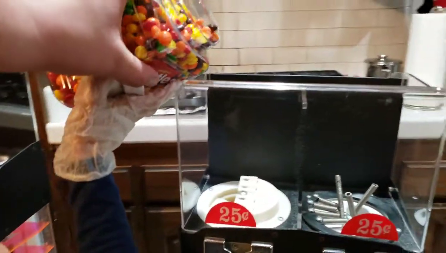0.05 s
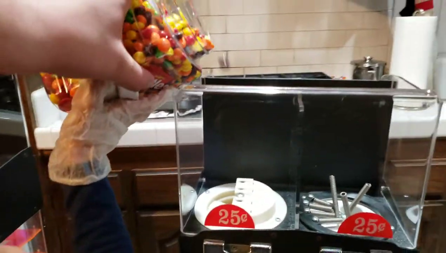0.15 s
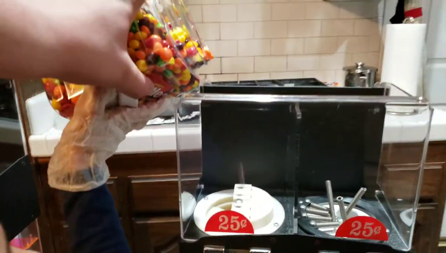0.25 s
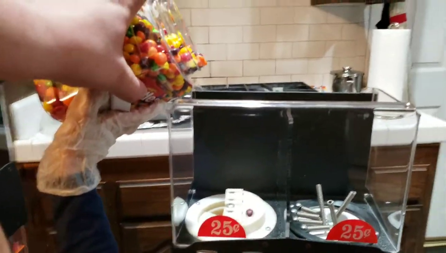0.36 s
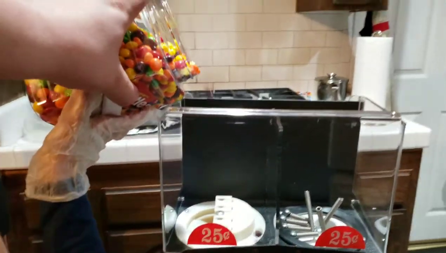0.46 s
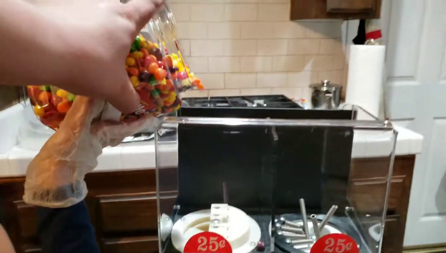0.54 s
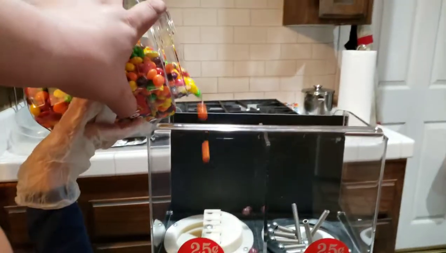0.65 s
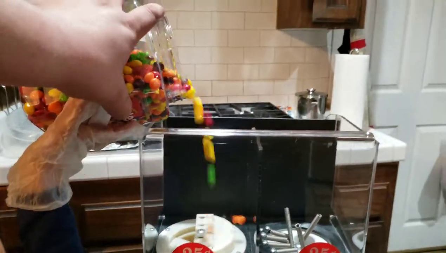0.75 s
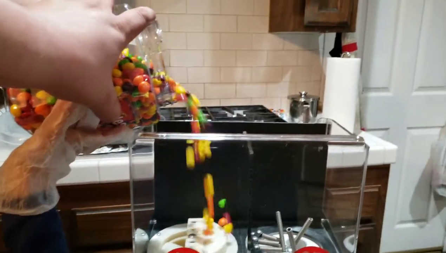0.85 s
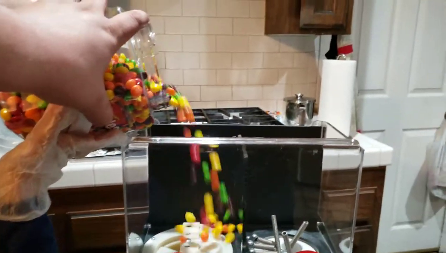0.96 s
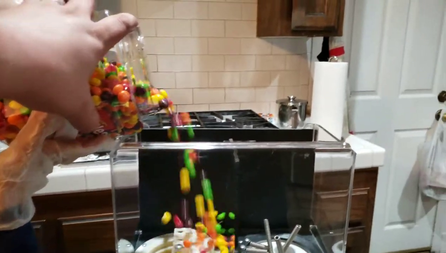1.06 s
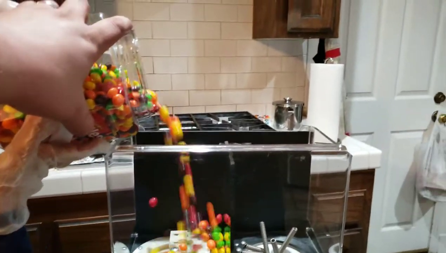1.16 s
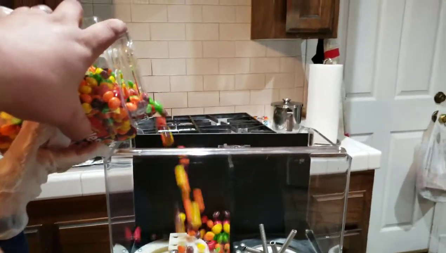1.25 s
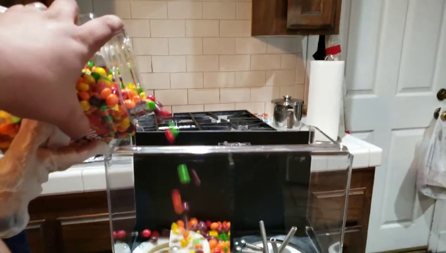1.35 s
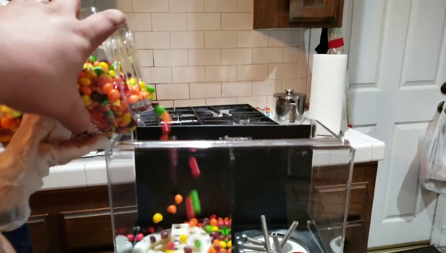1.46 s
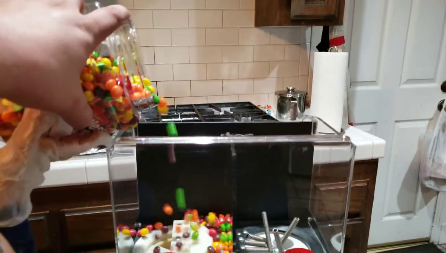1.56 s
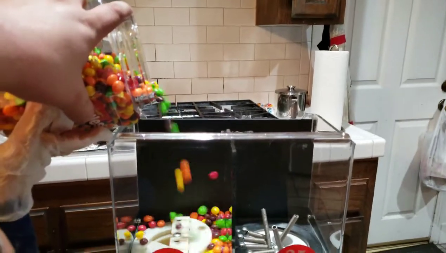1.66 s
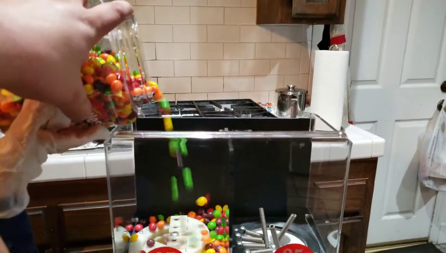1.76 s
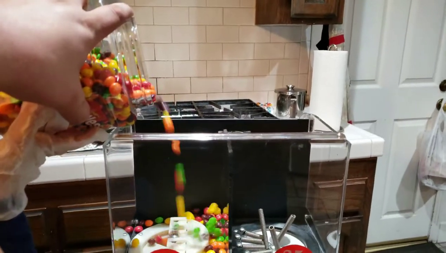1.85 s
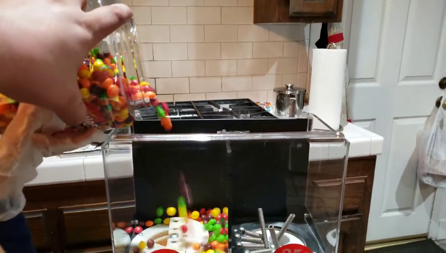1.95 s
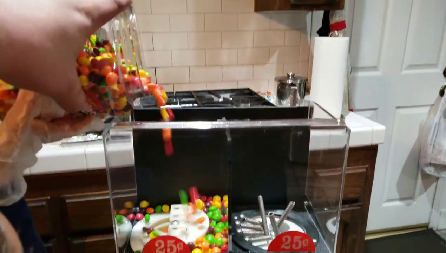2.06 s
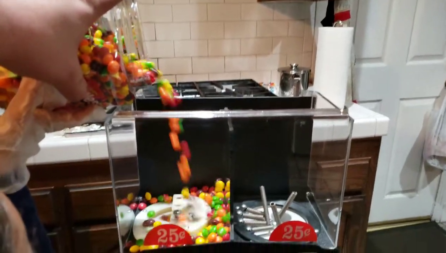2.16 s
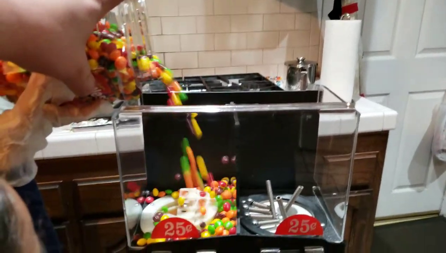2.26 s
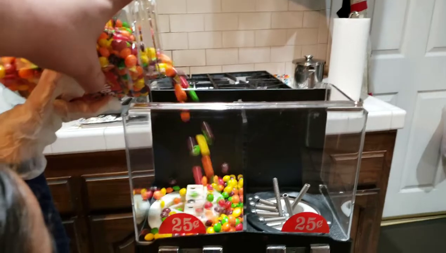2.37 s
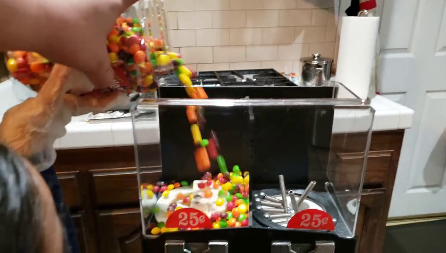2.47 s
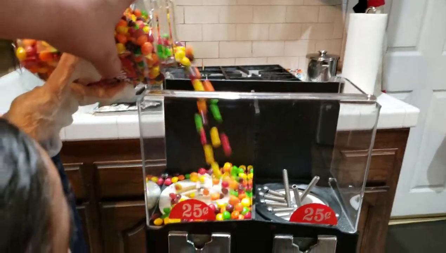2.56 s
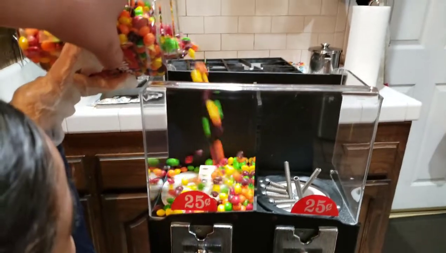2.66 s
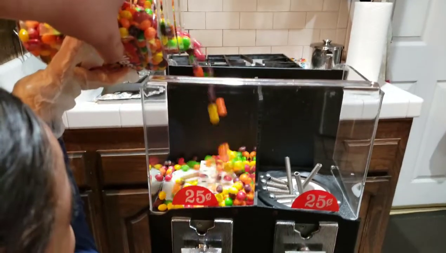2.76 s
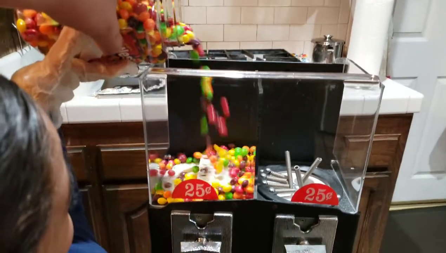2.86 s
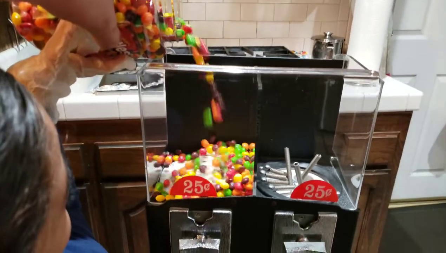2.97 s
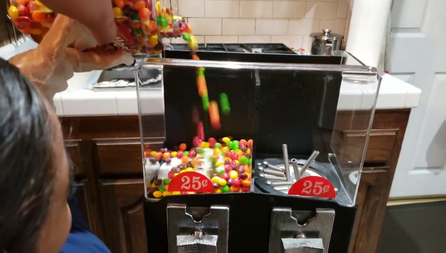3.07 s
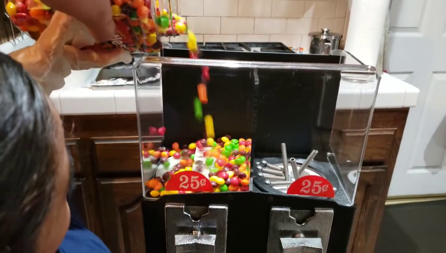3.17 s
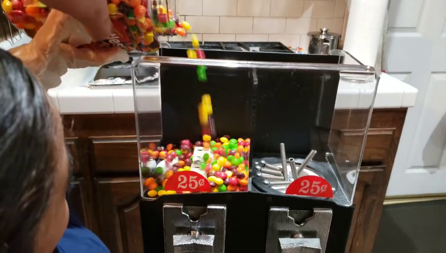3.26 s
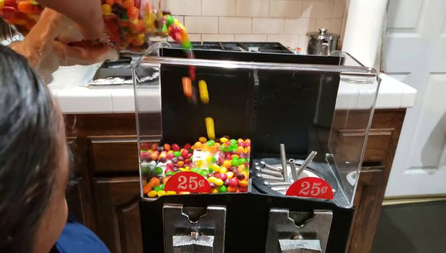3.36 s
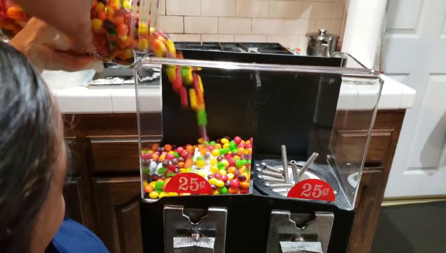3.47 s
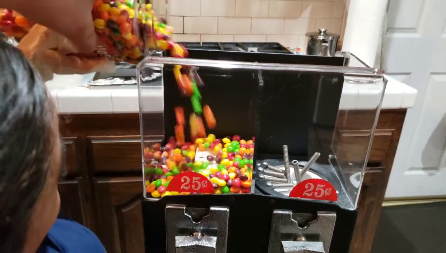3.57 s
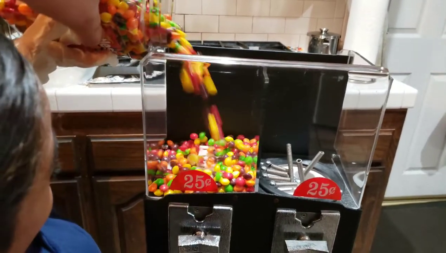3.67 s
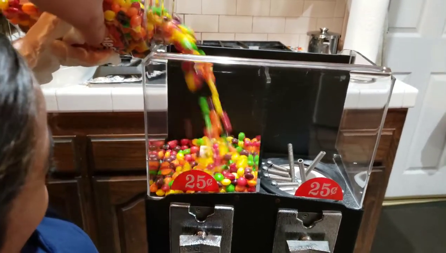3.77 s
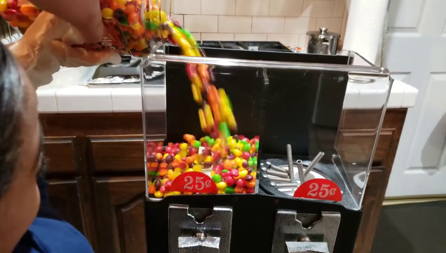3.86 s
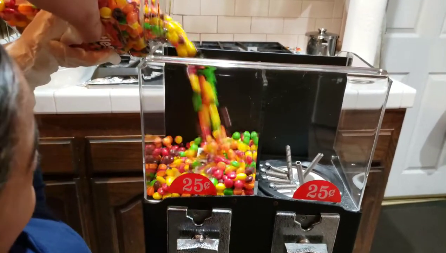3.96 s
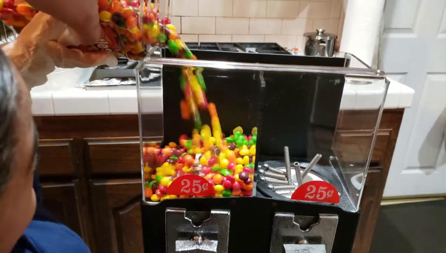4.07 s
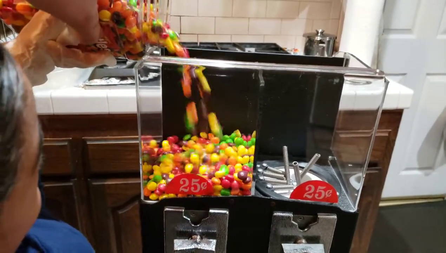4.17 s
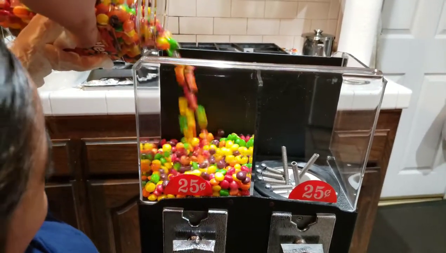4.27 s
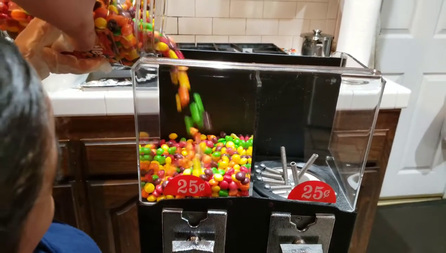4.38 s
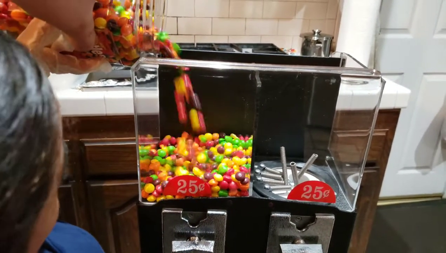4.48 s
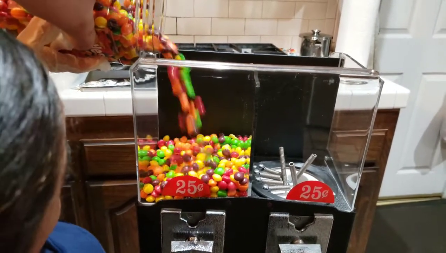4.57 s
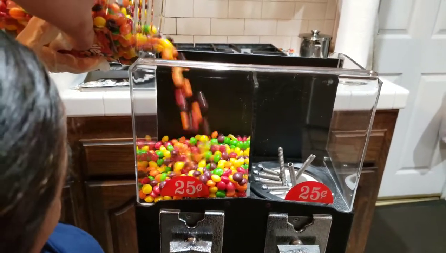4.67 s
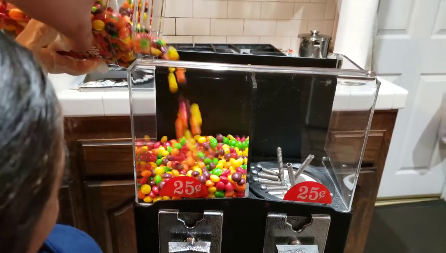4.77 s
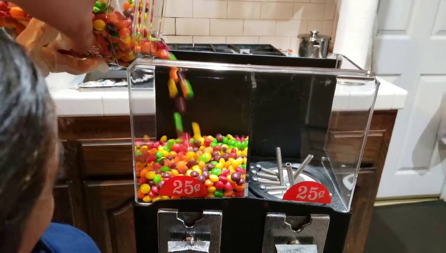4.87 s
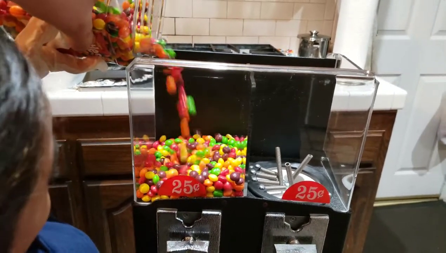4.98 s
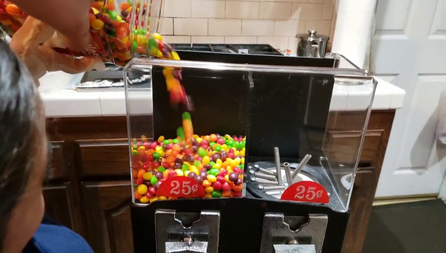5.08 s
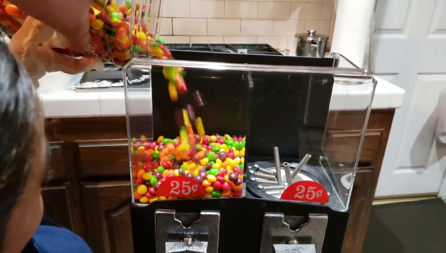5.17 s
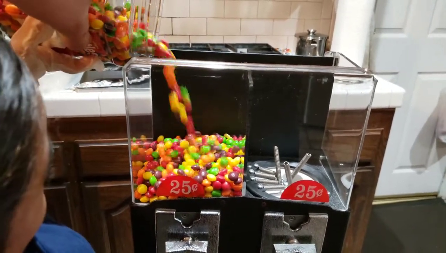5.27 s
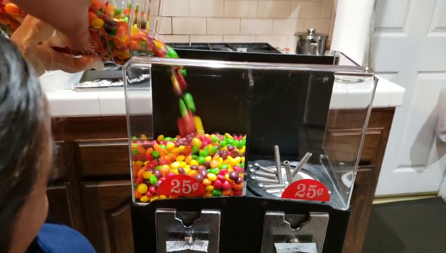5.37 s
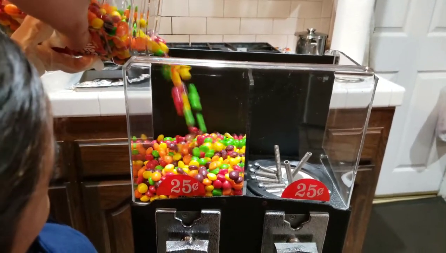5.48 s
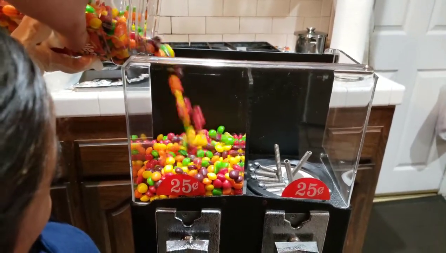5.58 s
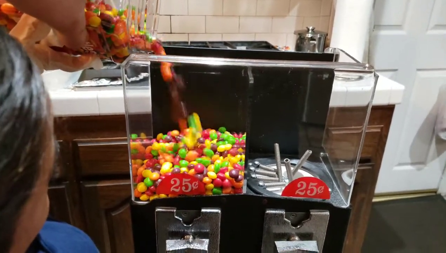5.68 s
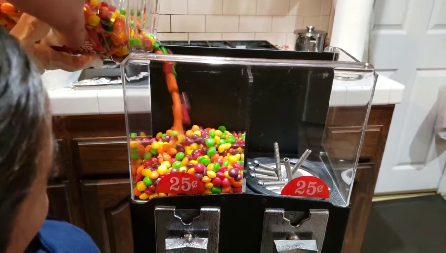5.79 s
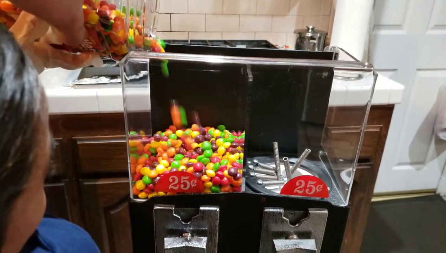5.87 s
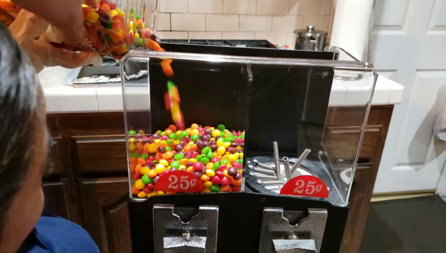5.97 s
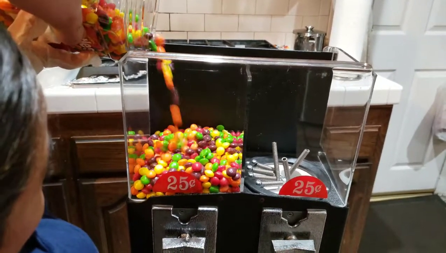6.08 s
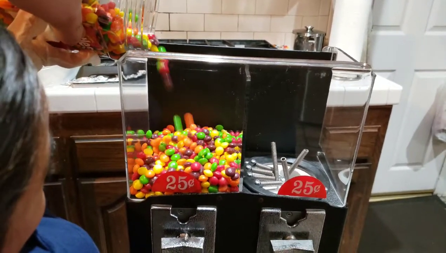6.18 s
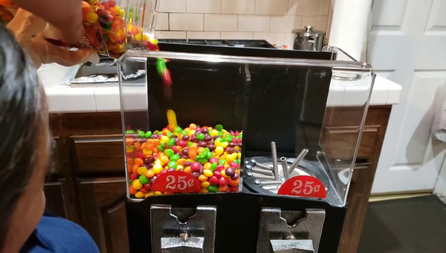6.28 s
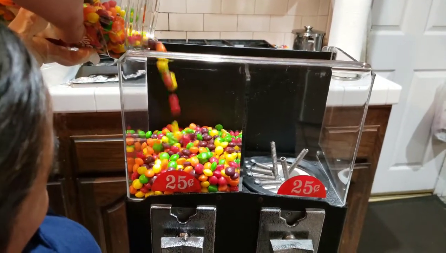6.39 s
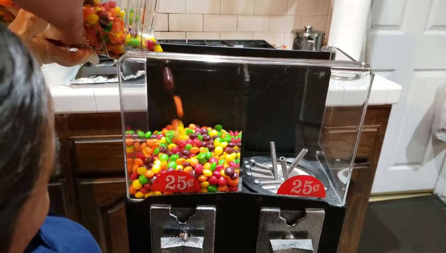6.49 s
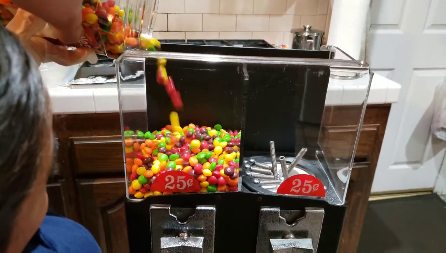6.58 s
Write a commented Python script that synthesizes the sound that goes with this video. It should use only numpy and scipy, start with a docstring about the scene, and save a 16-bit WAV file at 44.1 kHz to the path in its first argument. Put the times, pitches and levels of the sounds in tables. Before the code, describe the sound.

Hard-shelled candies pour from a crinkly bag into a plastic canister in a kitchen, ringing hollow at first, then clattering candy on candy.

```python
"""A bag crinkles in a kitchen as hard-shelled candies slide to its lip: bright noise ticks over low noise.
The first few knock on a clear plastic canister and its dispensing wheel: cracks of noise and decaying modes.
Then a stream follows: showers of random impacts of shell on shell, on the heap and on the plastic.
As the heap grows, the walls ring less, candy lands on candy and small clinks multiply.
Towards the end the pour thins, and clear clinks stand out on top of the heap."""
import sys
import numpy as np
from scipy import signal
from scipy.io import wavfile
from scipy.ndimage import uniform_filter1d

SR = 44100
rng = np.random.default_rng(int(sys.argv[2]) if len(sys.argv) > 2 else 0)


def dump_mix(stems):
    """Bounce the given channels to the path in sys.argv[1] as a 16-bit WAV at rate SR."""
    frames = np.atleast_2d(stems).T  # one column per channel
    limited = np.clip(frames, -1, 1)  # hard clip at full scale
    pcm = np.round(limited * 32767).astype(np.int16)
    wavfile.write(sys.argv[1], SR, pcm)


N = 292471
TIME = np.arange(N) / SR  # s, the whole scene
RING = np.arange(12288) / SR  # s, the length of one strike

# dull bumps of handling: start_s (of the middle), level_db (rms at the middle), length_s
BUMPS = [(.175, -48, 0.041), (.25, -47, 0.12), (0.362, -44.5, .06), (3.504, -57, 0.068)]
# snaps of the plastic bag as it tips: start_s, peak_db (before the echo)
CRINKLES = [(0.0336, -22), (0.0862, -31), (0.1024, -36), (0.1475, -30), (0.2012, -18), (0.221, -26),
            (0.2974, -26), (0.4323, -18)]
# candy sliding to the lip before the stream starts: start_s, length_s, level_db, fade_db_per_s
SLIDES = [(-.05, 0.31, -33, -38), (0.584, .2, -35, -3)]
# hollow knocks of a candy on the dispensing wheel at the bottom: start_s, peak_db (before the echo)
WHEEL_HITS = [(0.45, -19), (0.5474, -26.5), (0.7069, -27), (1.859, -32), (1.952, -33), (2.3692, -26),
              (2.528, -23.5), (2.7494, -28), (3.027, -26), (3.1, -28.5)]
# single candies hitting the plastic: start_s, level_db, brightness_db_per_octave, canister_ringing_db
KNOCKS = [(0.3058, -15.5, -0.5, 1.5), (0.3272, -16.5, -0.5, -16), (0.448, -16.5, 1.5, 0),
          (0.5091, -17.5, 3.5, -14), (0.5476, -19, 1, -1), (.583, -14, 1.5, -7), (0.587, -18.5, 3, 6),
          (.635, -11, 5, -14), (0.708, -19, 3, 6), (0.733, -18.5, 1.5, 0), (0.7897, -17.5, -0.5, -4),
          (0.8016, -5, 11, -19), (0.9033, -12, 6, -3), (0.971, -11, 4, 0), (1.023, -19.5, 1, -10),
          (1.279, -14.5, 8, 0.5), (3.58, -18, 4, -6), (3.786, -14.5, 4.5, -5), (3.9146, -15, 1.5, -5),
          (4.4154, -16, 3.5, 2.5)]
# sharp clacks of shell on shell: start_s, level_db, brightness_db_per_octave
CLACKS = [(1.734, -21, -4), (1.7891, -19.5, 0), (1.824, -21, 0.5), (1.865, -18, 4), (1.9218, -16.5, 2),
          (1.982, -18, 2), (2.0136, -20, 4), (2.1068, -19, -1.5), (2.2313, -15.5, 1.5), (2.3057, -12, 3),
          (2.384, -13, 6), (2.524, -17, 6), (2.553, -15, 2), (2.843, -27, 7), (2.9727, -15.5, 5),
          (3.022, -13.5, 1), (3.1888, -14.5, 6), (3.32, -15.5, -1), (3.46, -20.5, -4), (3.772, -16.5, -2),
          (4.9128, -18, -2), (5.256, -15, -1), (5.692, -17, 2), (5.7729, -15, 7), (5.8458, -19.5, 0),
          (6.1363, -17, -1.5), (6.2915, -14.5, 1.5)]
# clean clinks of one candy striking another on top of the heap: start_s, peak_db (dry), pitch_hz
CLINKS = [(3.315, -31, 3960), (6.0566, -30.5, 4170), (6.0931, -32, 4440), (6.2467, -31, 4230),
          (6.334, -31, 4440), (6.345, -26.5, 4200), (6.4268, -29.5, 4300), (6.4918, -20.5, 4170),
          (6.535, -24, 4280), (6.6149, -28, 4230)]
# fainter clinks inside the stream: pitch_hz (centre), peak_db (typical, re the flow), rate_per_s (full heap)
SMALL_CLINKS = [(2306, -13.5, 25), (4340, -11, 45), (11830, -7, 51)]
# how hard the candy pours from the bag: start_s, flow_db
FLOW = [(0.77, -32.5), (0.83, -22), (0.99, -20.5), (1.2, -23), (1.5, -28.0), (1.66, -29.5), (1.9, -27.5),
        (2.15, -29.5), (2.24, -26), (2.7, -24), (3.1, -27), (3.46, -27.5), (3.58, -23), (3.68, -26),
        (3.96, -23.4), (4.42, -25.5), (4.95, -27.5), (5.26, -27), (5.72, -26.5), (5.98, -31.5), (6.14, -30),
        (6.63, -29.5)]
# candies jam at the lip (a dip) or tumble over it in a clump (a surge): start_s (of the middle), change_db
STUTTERS = [(1.705, -5.5), (1.772, -10.5), (2.059, -7.5), (2.16, -4.5), (3.58, 2), (3.781, 2.5), (3.86, -1),
            (4.28, 2.5), (4.7, 2), (4.89, -3), (5.97, -4), (6.27, -4.5)]

# ringing modes of the canister: pitch_hz, energy_db (relative), t60_s
CANISTER = [(129, -41, 1), (180.5, -31, 0.54), (323, -23, 0.17), (355.4, -23.5, 0.18), (401, -19.5, 0.24),
            (566.7, -22.5, 0.27), (655.6, -25.5, 0.32), (908, -23, 0.39), (1347, -14, 0.068),
            (1515, -12.5, 0.062), (1685, -16.5, 0.043), (1758, -39, 0.39), (1960, -25, 0.058),
            (2306, -16, 0.21), (2470, -20, 0.032), (2510, -19.5, 0.26), (3107, -15, 0.084),
            (4195, -15.5, 0.17)]
# ringing modes of the hollow above the heap: pitch_hz, energy_db (relative), t60_s
HOLLOW = [(177, -43, 0.32), (317.5, -26.5, 0.17), (402.7, -25.5, 0.21), (485, -21.5, 0.1),
          (2050, -57, 0.088), (2430, -31, 0.1), (3550, -6.5, 0.0052)]
# brief modes of candies jostling in the bag and the heap: pitch_hz, energy_db (relative), t60_s
JOSTLE = [(428, -28.5, 0.061), (1325, -25, 0.03), (2265, -35, 0.036), (4230, -15, 0.053),
          (7760, -13, 0.0065), (11500, -7, 0.01)]
# ringing modes of the dispensing wheel: pitch_hz, energy_db (relative), t60_s
WHEEL = [(1350, -0.5, 0.1), (1500, -1.5, 0.044), (1686, -10, 0.054), (1814, -4.5, 0.22)]
# colour of a candy on plastic: frequency_hz, density_db (per Hz)
PLASTIC = [(60, -76), (220, -14), (330, -5.5), (600, -1.5), (780, -4.5), (1150, -7), (1400, 0.5), (2600, 1),
           (4300, 0), (7500, -4), (9000, -6.5), (16000, -7.5)]
# colour of a candy on the heap: frequency_hz, density_db (per Hz)
HEAP = [(60, -28.5), (230, -17), (350, -11.5), (750, -12.5), (1100, -7.5), (1800, -8.5), (2400, -6),
        (4400, -2), (5600, -4.5), (6400, -3.5), (7700, -0.5), (8600, -7), (16000, -10.5)]
# colour of shell on shell: frequency_hz, density_db (per Hz)
SHELL = [(60, -45), (200, -24), (350, -9), (750, -18), (1100, -8.5), (1800, -7), (2250, -4.5),
         (2800, -10.5), (3500, 0.5), (4400, 2.5), (5600, -9), (7600, -3.5), (8700, -7.5), (11500, 6),
         (15500, 0.5)]
# resonances that swell and fade as the heap rises:
# pitch_hz, width_hz, strongest_fill (0-1), fill_range (0-1), boost_db (at the strongest)
FILL_MODES = [(2622, 29, 0.05, 0.11, 10), (2955, 52, 0.25, 0.17, 6.5), (1396, 85, 0.37, 0.45, 2.5),
              (4700, 790, 0.48, .15, 3), (2350, 110, 0.64, 0.18, 7), (427, 1170, 1, 0.14, 6),
              (2090, 150, 1, 0.25, 5)]

FLOOR_DB = -68  # rms of the room's low noise
EDGE_HZ = 15820  # upper band limit of the recorder
ROOM_T60_LOW, ROOM_T60_HIGH = 0.47, 0.3  # s, below and above about 2 kHz
ROOM_SPLIT = signal.butter(1, 2000, fs=SR)
STUTTER_S = 0.037
# share of the flow heard as shells chattering, landings on the heap, and blows on the plastic (canister empty)
CHATTER_DB, HEAP_DB, PLASTIC_DB = -5, -3, -8
COVERED_DB = -7.5  # blows on the plastic fade as the heap covers it
SHORT_DROP_DB, SHORT_DROP_POWER = -5.5, 5  # landings soften once the heap is high and the fall is short
LATE_CHATTER_DB = 4  # meanwhile the loose candy in the emptying bag chatters more
THINNING = 0.6  # a weaker flow has fewer impacts: their rate goes as its amplitude to this power
CLINK_SPREAD_DB, CLINK_DETUNE = 3.5, 0.046  # standard deviations of level and of relative pitch


def amp(db):
    """Decibels to gain."""
    return 10 ** (np.asarray(db) / 20)


def unit(x):
    """Scales to energy 1."""
    return x / np.linalg.norm(x)


def read(points, hz):
    """Reads a colour table on a log-frequency axis."""
    f, value = np.transpose(points)
    return np.interp(np.log(hz + 1), np.log(f), value)


def add(mix, s, sound):
    """Lays a sound into the mix at time s."""
    part = mix[max(round(s * SR), 0):][:len(sound)]
    part += sound[:len(part)]


def swell(s, length):
    """A smooth bump of height 1 around time s."""
    return np.exp(-(2 * (TIME - s) / length) ** 2)


def dying(t60):
    """An exponential decay over the length of one strike."""
    return np.exp(-np.log(1000) * RING / t60)


def low_noise(top_hz):
    """Dark noise of rms 1."""
    band = signal.butter(2, [35, top_hz], "bandpass", fs=SR, output="sos")
    return unit(signal.sosfilt(band, rng.standard_normal(N))) * np.sqrt(N)


def background():
    """Handling bumps, as swells of very low noise, over the steady low noise of the room."""
    bumps = sum(amp(db) * swell(s, length) for s, db, length in BUMPS)
    return bumps * low_noise(top_hz=118) + amp(FLOOR_DB) * low_noise(top_hz=500)


def room_tail():
    """Diffuse echo of the kitchen; the treble dies first."""
    noise = rng.standard_normal(len(RING))
    low = signal.lfilter(*ROOM_SPLIT, noise)
    tail = low * dying(ROOM_T60_LOW) + (noise - low) * dying(ROOM_T60_HIGH)
    build_up = 1 - np.exp(-RING / 0.0037)
    return unit(tail * build_up)


def in_room(x, room_db):
    """A sound with the kitchen's echo behind it."""
    return x + amp(room_db) * signal.fftconvolve(x, room_tail())[:N]


def crinkles(t60=0.006, low_hz=2500, room_db=-9):
    """The bag snaps: very short, bright ticks of high-passed noise."""
    out = np.zeros(N)
    high_pass = signal.butter(1, low_hz, "highpass", fs=SR)
    for s, db in CRINKLES:
        tick = signal.lfilter(*high_pass, rng.standard_normal(len(RING)) * dying(t60))
        add(out, s, amp(db) * tick / abs(tick).max())
    return in_room(out, room_db)


def ringing(modes, detune):
    """Decaying modes, each weighted and detuned by where the candy lands."""
    sound = np.zeros(len(RING))
    landing = rng.uniform(-1, 1, (len(modes), 2))
    for (hz, db, t60), (weight, shift) in zip(modes, landing):
        t = RING[RING < max(t60, 0.002)]
        decay = np.exp(-np.log(1000) * t / t60)
        ring = np.sin(2 * np.pi * hz * (1 + detune * shift) * t) * decay
        gain = amp(db) * np.sign(weight) * (0.5 + abs(weight))
        add(sound, 0, gain * unit(ring))
    return sound


def wheel(room_db=-8):
    """The wheel answers each candy with a low, pitched knock made of its modes."""
    out = np.zeros(N)
    for s, db in WHEEL_HITS:
        ring = ringing(WHEEL, detune=0.0081)
        add(out, s, amp(db) * ring / abs(ring).max())
    return in_room(out, room_db)


def causal(db):
    """The most compact causal pulse with this spectrum (minimum phase)."""
    log_gain = np.log(amp(np.r_[db, db[-2:0:-1]]))
    return np.fft.ifft(np.exp(np.conj(signal.hilbert(log_gain)))).real


def shell_pings(ping_db, ping_t60=0.051, count=5):
    """Every contact also has a few short pitches of its own."""
    pitches = np.exp(rng.uniform(np.log(2000), np.log(15000), count))
    return ringing([(hz, ping_db, ping_t60) for hz in pitches], 0)


def strike(colour, modes, crack_t60, box_db, room_db, patchy_db, detune, tilt_db=0, ring_db=0,
           ping_db=-12, box_t60=0.17, rise_s=0.001):
    """One impact of energy 1: a crack, quick echoes between the walls, the room, and ringing modes."""
    crack, box = rng.standard_normal((2, len(RING)))
    burst = unit(crack * dying(crack_t60))
    burst = burst + amp(box_db) * unit(box * dying(box_t60))
    burst = burst + amp(room_db) * room_tail()
    # each point of contact favours its own bands
    hz = np.fft.rfftfreq(2048, 1 / SR)
    patches = uniform_filter1d(rng.standard_normal(len(hz)), size=44)
    # a harder, shorter contact is brighter: tilt in dB per octave above 1200 Hz
    hardness_db = tilt_db * np.log2(np.maximum(hz, 1200) / 1200)
    pulse = causal(read(colour, hz) + patchy_db * patches / patches.std() + hardness_db)
    clack = unit(signal.fftconvolve(burst, pulse)[:len(RING)])
    # a brighter contact rings the modes less
    sound = clack + amp(ring_db - tilt_db) * ringing(modes, detune) + shell_pings(ping_db)
    # the sound builds up over about a millisecond, a softened attack
    return unit(sound * (1 - np.exp(-RING / rise_s)))


def shower(level_db, per_s, spread_db, make_strike, count=70):
    """Many impacts at random moments and of random size, sharing the energy that the flow delivers."""
    busy = amp(THINNING * (level_db - level_db.max()))  # 1 at the strongest flow, where the rate is per_s
    sizes = amp(spread_db * np.minimum(rng.standard_normal(N), 2))
    sizes = sizes * (rng.random(N) < busy * per_s / SR) / np.sqrt(busy)
    # part of the chance clustering is evened out, then the flow sets the level
    power = uniform_filter1d(uniform_filter1d(sizes ** 2, size=1700), size=1700)
    sizes = sizes / np.sqrt(abs(power) + 0.66 * power.mean()) * amp(level_db)
    # the stream wanders: about ten spots are being hit at a time, and new ones replace the old
    spot = (TIME / TIME[-1] * count + 10 * rng.random(N)).astype(int)
    hits = np.flatnonzero(sizes)
    out = np.zeros(N)
    for k in range(count + 10):
        sound = make_strike()
        for at in hits[spot[hits] == k]:
            add(out, at / SR, sizes[at] * sound)
    return out


def nudge():
    """A soft, dull and short contact of shell on shell in the bag."""
    return strike(SHELL, JOSTLE, crack_t60=0.0017, box_db=-19, room_db=-7, patchy_db=4.5, detune=0.073,
                  tilt_db=-3.5, ring_db=-18, ping_db=-20, box_t60=0.023, rise_s=0.00028)


def sliding():
    """Candies nudge each other as the bag tips: dense showers of small contacts."""
    level_db = np.full(N, -200.0)
    for start, length, db, fade in SLIDES:
        on = (TIME >= start) & (TIME < start + length)
        level_db[on] = db + fade * (TIME[on] - start)
    return shower(level_db, per_s=700, spread_db=0.5, make_strike=nudge, count=20)


def knocks(span_s=0.0022):
    """Loud blows on the plastic; a level is the blow's energy spread over span_s."""
    out = np.zeros(N)
    for s, db, bright, ring in KNOCKS:
        knock = strike(PLASTIC, CANISTER, crack_t60=0.024, box_db=-3, room_db=-2, patchy_db=1.5,
                       detune=0.002, tilt_db=bright, ring_db=ring, ping_db=-23, rise_s=0.0007)
        add(out, s, amp(db) * knock)
    return out * np.sqrt(span_s * SR)


def clacks(span_s=0.0012):
    """Loud clacks of shell on shell; a level is the clack's energy spread over span_s."""
    out = np.zeros(N)
    for s, db, bright in CLACKS:
        # a duller, heavier contact sets the bag and the heap ringing
        ring_db = -6.5 - 1.6 * bright
        clack = strike(SHELL, JOSTLE, crack_t60=0.0067, box_db=-1, room_db=-11, patchy_db=4.5,
                       detune=0.015, tilt_db=bright, ring_db=ring_db, ping_db=-21.5, rise_s=0.00048)
        add(out, s, amp(db) * clack)
    return out * np.sqrt(span_s * SR)


def clink(hz, rise_s=0.00086, t60=0.011):
    """One short pitch of peak 1."""
    ring = np.sin(2 * np.pi * hz * RING) * (1 - np.exp(-RING / rise_s)) ** 2 * dying(t60)
    return ring / abs(ring).max()


def clinks(flow_db, fill, room_db=-8):
    """Candy meets candy cleanly: a few loud clinks, and many faint ones inside the stream."""
    out = np.zeros(N)
    for s, db, hz in CLINKS:
        add(out, s, amp(db) * clink(hz))
    for hz, db, per_s in SMALL_CLINKS:
        # more frequent as the heap grows
        hits = np.flatnonzero(rng.random(N) < np.sqrt(fill) * per_s / SR)
        size, shift = np.clip(rng.standard_normal((2, N)), -2, 2)
        for at in hits:
            level_db = flow_db[at] + db + CLINK_SPREAD_DB * size[at]
            pitch_hz = hz * (1 + CLINK_DETUNE * shift[at])
            add(out, at / SR, amp(level_db) * clink(pitch_hz))
    return in_room(out, room_db)


def pour():
    """The flow in dB with its stutters, and the height of the heap (0-1) that it builds."""
    flow_db = np.interp(TIME, *np.transpose(FLOW), left=-200)
    flow_db = flow_db + sum(db * swell(s, STUTTER_S) for s, db in STUTTERS)
    poured = np.cumsum(amp(flow_db))
    return flow_db, poured / poured[-1]


def shell_contact():
    """Shell on shell in the stream: a short crack with brief rings."""
    return strike(SHELL, JOSTLE, crack_t60=0.0036, box_db=-5, room_db=-11.5, patchy_db=3.5, detune=0.026,
                  ring_db=-6, ping_db=-19, rise_s=0.00075)


def heap_landing():
    """A candy on the heap: a longer crack with the hollow above it answering."""
    return strike(HEAP, HOLLOW, crack_t60=0.008, box_db=0, room_db=-1, patchy_db=4, detune=0.04,
                  ring_db=-2, ping_db=-12)


def wall_blow():
    """A candy on the plastic: the canister's modes ring strongly."""
    return strike(PLASTIC, CANISTER, crack_t60=0.011, box_db=-3, room_db=0, patchy_db=4.5, detune=0.0171,
                  ring_db=8)


def stream(flow_db, fill):
    """Falling candies chatter, land on the heap and rattle on plastic; the rising heap shifts the balance."""
    short_drop = fill ** SHORT_DROP_POWER
    chatter_db = flow_db + CHATTER_DB + LATE_CHATTER_DB * short_drop
    landing_db = flow_db + HEAP_DB + SHORT_DROP_DB * short_drop
    rattle_db = flow_db + PLASTIC_DB + COVERED_DB * fill
    chatter = shower(chatter_db, per_s=600, spread_db=5.2, make_strike=shell_contact)
    landings = shower(landing_db, per_s=380, spread_db=4.8, make_strike=heap_landing)
    rattle = shower(rattle_db, per_s=240, spread_db=4.5, make_strike=wall_blow, count=30)
    return chatter + landings + rattle


def filling(x, fill):
    """Each resonance of the canister swells and fades as the heap rises past it."""
    out = x
    for hz, width, strongest, reach, boost_db in FILL_MODES:
        present = np.exp(-((fill - strongest) / reach) ** 2)
        resonance = signal.lfilter(*signal.iirpeak(hz, hz / width, fs=SR), x)
        out = out + (amp(boost_db) - 1) * present * resonance
    return out


def scene():
    """All sources at one microphone; the candy sounds pass through the filling canister."""
    flow_db, fill = pour()
    candy = sliding() + knocks() + clacks() + clinks(flow_db, fill) + stream(flow_db, fill)
    return (background() + crinkles() + wheel() + filling(candy, fill))[None]


def record(dry):
    """The microphone's bass roll-off and the recorder's band limit."""
    thin = signal.sosfilt(signal.butter(2, 32, "highpass", fs=SR, output="sos"), dry)
    band_limit = signal.firwin(701, EDGE_HZ, window=("kaiser", 9), fs=SR)
    return signal.oaconvolve(thin, band_limit[None], "same")


dry = scene()
out = record(dry)
dump_mix(out)
```